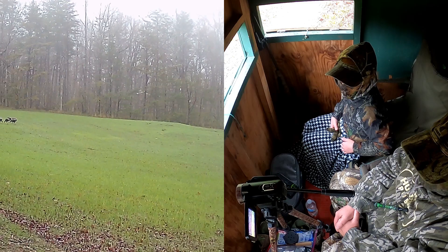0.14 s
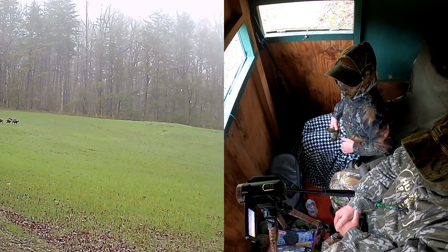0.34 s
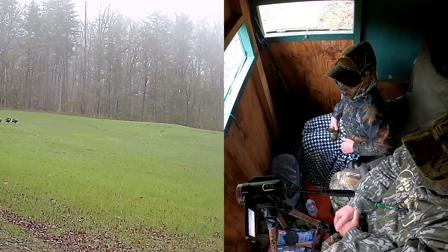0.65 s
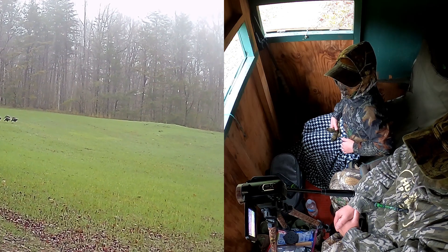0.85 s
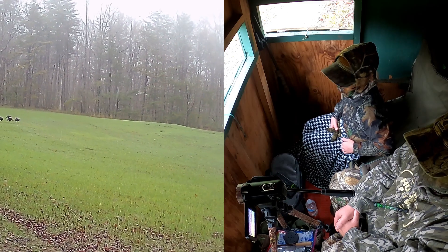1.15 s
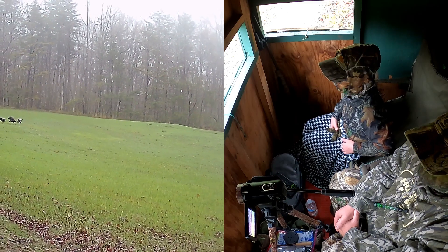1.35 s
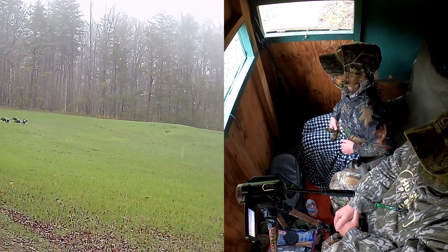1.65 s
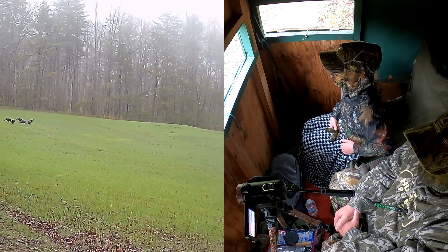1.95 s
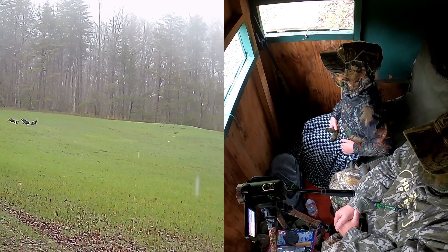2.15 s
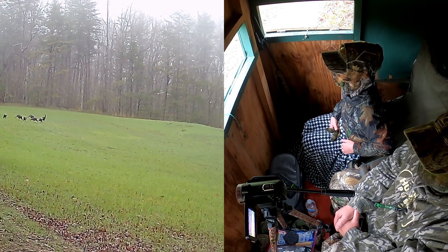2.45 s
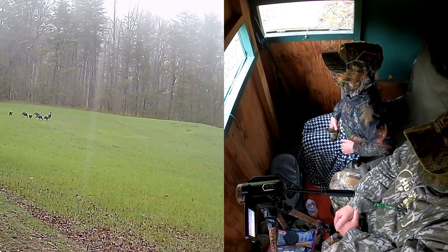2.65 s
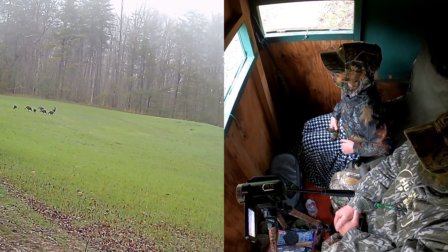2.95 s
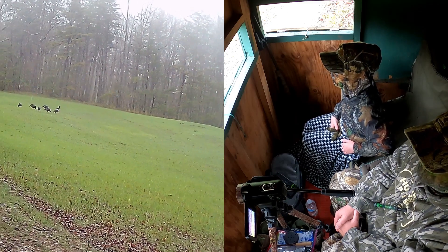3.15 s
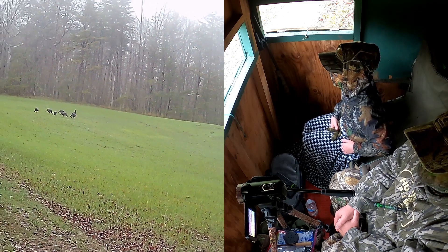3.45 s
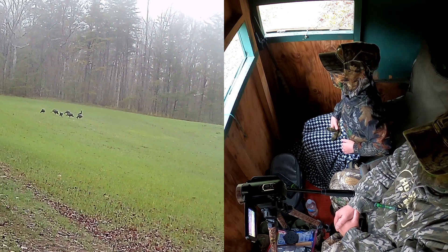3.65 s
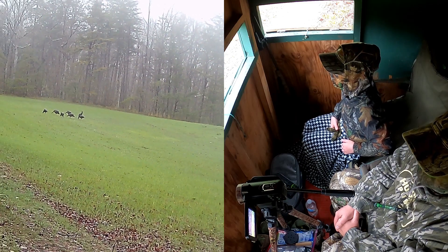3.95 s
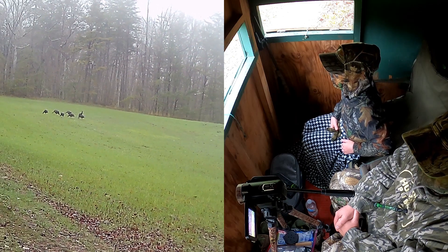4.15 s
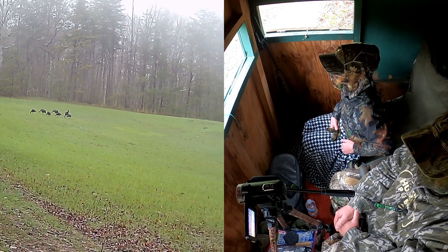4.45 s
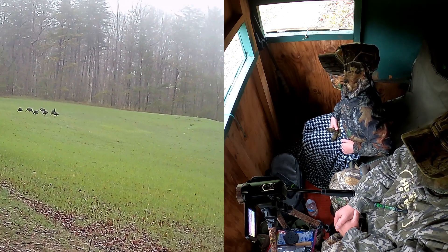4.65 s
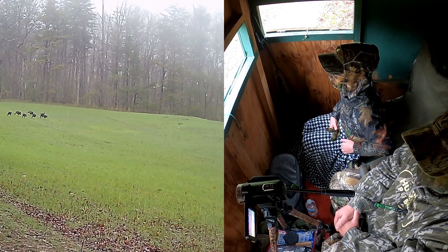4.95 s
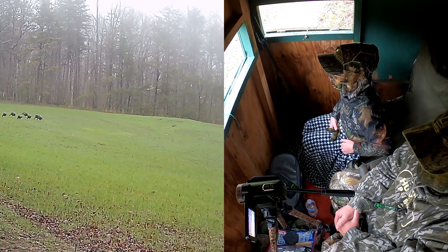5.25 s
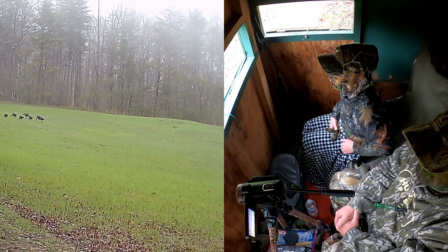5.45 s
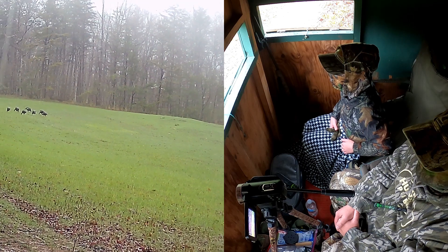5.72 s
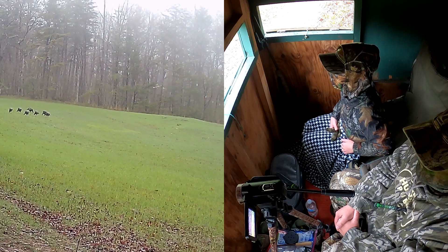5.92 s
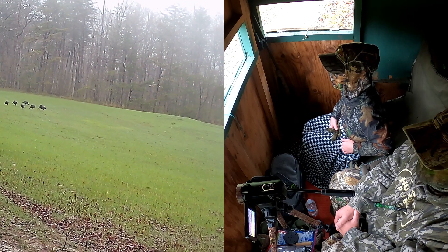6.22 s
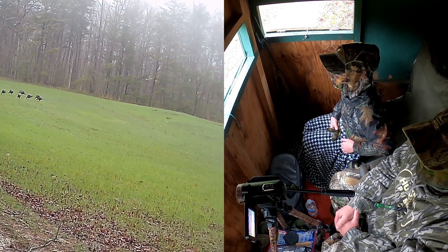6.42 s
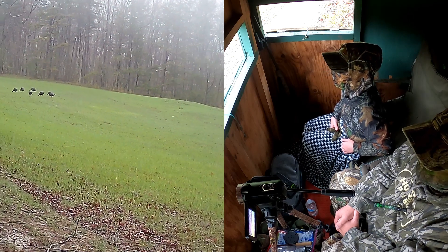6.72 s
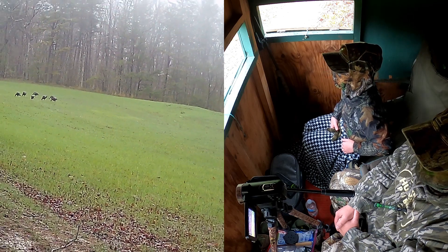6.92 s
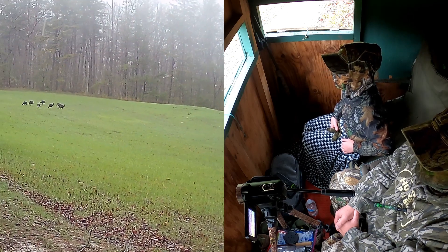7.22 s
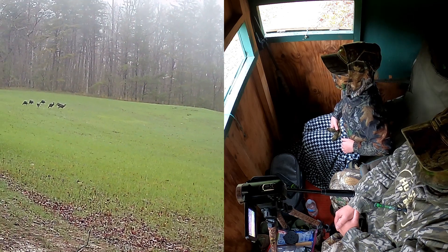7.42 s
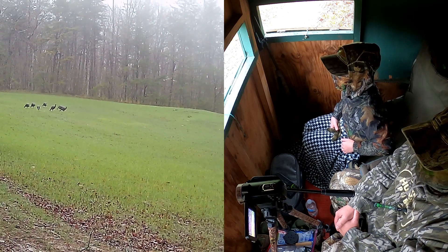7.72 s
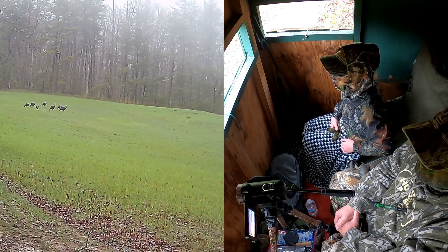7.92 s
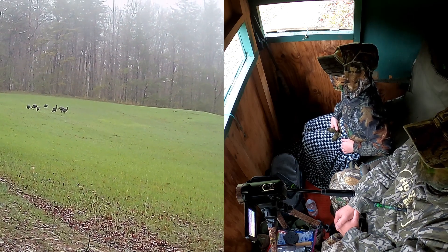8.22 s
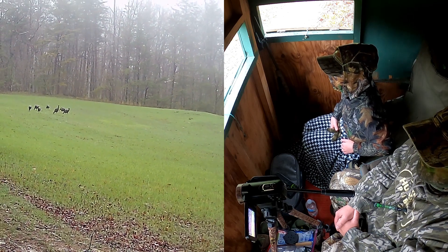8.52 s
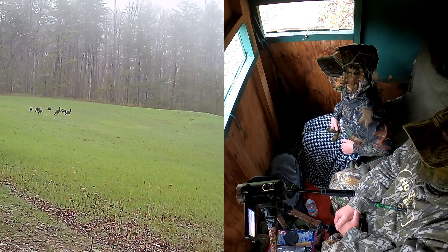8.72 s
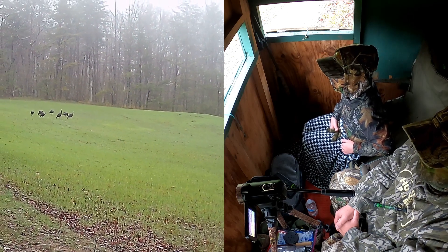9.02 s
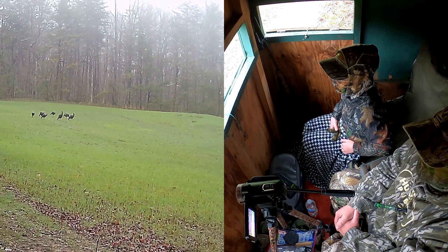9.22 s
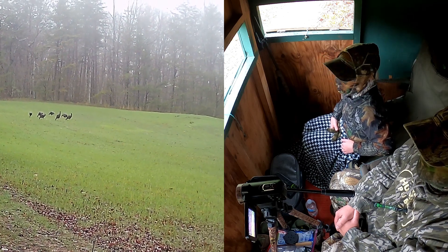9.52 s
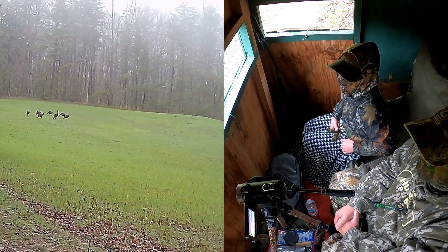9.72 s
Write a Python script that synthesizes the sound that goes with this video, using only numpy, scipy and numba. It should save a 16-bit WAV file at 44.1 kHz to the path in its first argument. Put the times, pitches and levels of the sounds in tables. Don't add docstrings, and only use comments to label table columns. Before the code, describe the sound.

Heard inside a small wooden shelter, irregular heavy drops tick and softly boom on the roof, with light drips, patter and quiet field hiss.

```python
import sys
import numpy as np
from scipy import signal
from scipy.fft import rfft, irfft
from scipy.io import wavfile
from scipy.ndimage import uniform_filter1d
from numba import njit

SR = 44100
rng = np.random.default_rng(int(sys.argv[2]) if len(sys.argv) > 2 else 0)


def gain_from_db(level_db):
    decades = np.asarray(level_db, float) / 20
    return 10 ** decades


def generate_wav(signal):
    frames = np.transpose(np.atleast_2d(signal))
    scaled = np.clip(frames, -1, 1) * 32767
    pcm = np.round(scaled).astype(np.int16)
    wavfile.write(sys.argv[1], SR, pcm)


N = 435250

# pitch in Hz, difference between ears re shared sound in dB.
SIDE_SHARE = [(60, -11.5), (110, -6), (200, -3), (380, -7), (700, -2.5), (1290, -8), (2380, -3.5),
              (4400, -3), (8120, 0), (15000, 1)]
WET_HZ = 2460


def on_log(hz, table):
    f, v = np.transpose(table)
    return np.interp(np.log(hz), np.log(f), v)


def walk(rate):
    k = int(SR / rate)
    held = np.repeat(rng.standard_normal(N // k + 1), k)
    return uniform_filter1d(uniform_filter1d(held, k), k)[:N]


def bed(table, flicker_db, rate):
    # pitch in Hz, left minus right in dB.
    lean_table = [(60, 0.5), (110, 3), (200, -2.5), (380, 0.5), (700, -1.5), (1290, 2), (2380, 6),
                  (4400, 2), (8120, 0), (15000, -2.5)]
    f = np.fft.rfftfreq(N, 1 / SR) + 1
    low, high = table[0][0], table[-1][0]
    colour = gain_from_db(on_log(f, table)) * (f > low) * (f < high)
    mid, side = rfft(rng.standard_normal((2, N))) * colour
    side = side * gain_from_db(on_log(f, SIDE_SHARE))
    lean = gain_from_db(on_log(f, lean_table) / 2)
    pair = np.array([(mid + side) * lean, (mid - side) / lean])
    out = 0
    for k in range(int(2 * np.log2(low)), int(2 * np.log2(high)) + 2):
        share = np.clip(1 - np.abs(2 * np.log2(f) - k), 0, 1)
        depth = 2.5 + 1.1 * (k > 26)
        out = out + irfft(pair * np.sqrt(share), N) * gain_from_db(flicker_db * depth * walk(rate))
    return out / np.std(out.mean(axis=0))


@njit
def add(out, start, hz, t60, rise, left, right):
    for m in range(len(hz)):
        turn = np.exp(2j * np.pi * hz[m] / SR - np.log(1000) / (t60[m] * SR))
        fade = np.exp(-1 / (rise[m] * SR))
        z, soft = 1 + 0j, 1.
        first = int(start[m] * SR)
        for j in range(max(first, 0), min(first + int(.75 * t60[m] * SR), out.shape[1])):
            z, soft = z * turn, soft * fade
            out[0, j] += left[m] * z.imag * (1 - soft)
            out[1, j] += right[m] * z.imag * (1 - soft)


def ring(s, hz, t60, rise, gain, pan_db, other):
    together = np.broadcast_arrays(s, hz, t60, rise, gain, pan_db, other)
    s, hz, t60, rise, gain, pan_db, other = (np.ravel(1. * a) for a in together)
    side = other * np.abs(gain) * gain_from_db(on_log(hz, SIDE_SHARE))
    left, right = (gain + side) * gain_from_db(pan_db / 2), (gain - side) * gain_from_db(-pan_db / 2)
    out = np.zeros((2, N))
    add(out, s, np.clip(hz, 20, .45 * SR), t60, rise, left, right)
    return out


def field_hiss(wind_db):
    # pitch in Hz, level in dB per Hz.
    hiss_colour = [(320, -14), (550, -3), (623, -19), (810, -19), (1070, 1), (1370, 2.5), (1810, -3),
                   (2660, -1), (4690, -4.5), (7720, -10.5), (10800, -25), (12700, -27.5), (15900, -56)]
    gust_db = 0.053 * (wind_db + 66)
    unrest_db = 0.1 * walk(0.96) + 0.53 * walk(9) + 1.76 * walk(45)
    return bed(hiss_colour, 0.82, 18) * gain_from_db(-62.5 + gust_db + unrest_db)


def roof_drumming(drum_db):
    # pitch in Hz, level in dB per Hz.
    drum_colour = [(44, -20), (78, 2), (103, -9.5), (140, -2.5), (172, 5), (205, -2.5), (284, -7),
                   (474, -14), (600, -24.5), (780, -21)]
    return bed(drum_colour, 1.54, 12) * gain_from_db(drum_db - 0.4)


def wind_rumble(wind_db):
    # pitch in Hz, level in dB per Hz.
    wind_colour = [(12, -1.5), (25, -3), (50, -1), (59, -8.5), (75, -40)]
    return bed(wind_colour, 3.8, 5.7) * gain_from_db(wind_db + 11.0)


def focus(hz, board_hz):
    octaves_off = np.log2(hz / board_hz[:, None])
    return 2.5 * np.exp(-(octaves_off / 0.81) ** 2)


def knock(s, knock_db, splash_db, pan_db, board_hz, count, last, pitch):
    # pitch in Hz, time to fade 60 dB in s.
    fade_times = [(600, 0.16), (1100, 0.1), (2900, 0.11), (7700, 0.061), (14000, 0.17)]
    # pitch in Hz, level in dB, time to fade 60 dB in s.
    skin_modes = [(1280, -25, 0.012), (1390, -5, 0.017), (1970, 1.5, 0.02), (2400, 5, 0.011),
                  (3270, 0, 0.024)]
    s, knock_db = s[:, None] + .0008, knock_db[:, None]
    splash_db, pan_db = splash_db[:, None], pan_db[:, None]
    place = rng.random((2, len(s), count))
    spot = rng.standard_normal((3, len(s), count))
    u = (np.arange(count) + place[0]) / count
    hz = 700 + 13500 * u ** 2
    octave = np.log2(hz / 1450)
    db = knock_db + splash_db * np.clip(octave / 1.69, 0, 3) - 25 * np.clip(-octave - .4, 0, 1)
    db = db - 61.0 * np.clip(octave - 2.1, 0, 3) ** 2
    db = db + 10 * np.log10(9000 * u / hz / count) + focus(hz, board_hz)

    tail_s = last * on_log(hz, fade_times)
    tail_start = s + 0.001198 + .004 * place[1]
    tail = ring(tail_start, hz, tail_s, 0.0006, gain_from_db(db - 1.5) * spot[2], 0.3 * pan_db, spot[1])

    step = 0.8 * np.clip(3 - octave, 0, 1) + .7 * spot[0]
    click_db = db + 3.0 - 12.9 * np.clip(.7 - octave, 0, 1)
    click = ring(s + 0.00033, hz, 0.011, 1e-4, gain_from_db(click_db) * step, pan_db, 1.4 * spot[1])

    skin_hz, skin_db, skin_s = np.transpose(skin_modes)
    n = len(skin_modes)
    skin_hz = np.outer(pitch, skin_hz) * (1 + 0.125 * spot[2, :, :n])
    skin_gain = gain_from_db(knock_db + skin_db - 12 + 2 * spot[0, :, :n] + focus(skin_hz, board_hz))
    snap = ring(s + 0.00046, skin_hz, skin_s, 0.00013, skin_gain, pan_db, .5 * spot[1, :, :n])

    own_hz = board_hz[:, None]
    blow_db = knock_db + 14 - 13 * np.clip(np.log2(1450 / own_hz), 0, 1)
    board = ring(s, own_hz, 8.5 / own_hz, .0006, gain_from_db(blow_db), pan_db, 0.47 * spot[1, :, :1])
    return tail + click + board + snap


def patter(count):
    when, size = rng.random((2, count))
    tone, pan = rng.standard_normal((2, count))
    size_db = -66 - np.clip(4.6 * np.log(size), -8.5, 0)
    splash_db = np.minimum(-6 + 14.0 * tone, 2)
    board_hz = WET_HZ * 2 ** (0.49 * tone)
    return knock(when * N / SR, size_db, splash_db, 3 + 2.0 * pan, board_hz,
                 count=32, last=0.26, pitch=2 ** (.5 + 0.404 * tone))


def mist(count):
    when, size = rng.random((2, count, 1))
    spot = rng.standard_normal((3, count, 12))
    hz = 11000 * 2 ** (0.26 * spot[0])
    gain = gain_from_db(-84 - np.clip(4 * np.log(size), -5, 0)) * spot[1]
    return ring(when * N / SR, hz, 0.0073, 1e-4, gain, -2.8, spot[2])


def boom(s, boom_db, thud_db, pan_db):
    # pitch in Hz, level in dB, time to fade 60 dB in s.
    panel_modes = [(45.5, -5.5, 0.28), (108, -3.5, 0.35), (142, -6, 0.081), (161, -1.5, 0.28),
                   (180, -5.5, 0.33), (216.1, -3.5, 0.2), (251.8, -1.5, 0.16), (299.3, 0.5, 0.14),
                   (351.4, 2, 0.094), (404.2, -6, 0.2), (437.3, -1, 0.11), (490, -2, 0.12),
                   (559.6, -5.5, 0.087), (649, -14.5, 0.16), (750, -22, 0.15), (926, -18, 0.16)]
    hz, db, t60 = np.transpose(panel_modes)
    spot = rng.standard_normal((5, len(s), len(hz)))
    level_db = np.where(hz < 230, boom_db[:, None], thud_db[:, None]) + db
    late = s[:, None] + 0.047 / np.sqrt(hz)
    pan_db = 0.31 * pan_db[:, None]
    swing_gain = -gain_from_db(level_db - 7 + 4 * spot[4])
    swing = ring(late, hz, 7.1 / hz, 0.00059, swing_gain, pan_db, 0.25 * spot[3])
    after_gain = gain_from_db(level_db - 2.5 + 3.93 * spot[0]) * np.sign(spot[1])
    after = ring(late, hz * (1 + 0.035 * spot[2]), t60, 0.0031, after_gain, pan_db, 0.5 * spot[3])
    return swing + after


def heavy_drops():
    # start in seconds, knock level in dB, boom in dB re knock,
    # splash in dB re knock, knock pitch in Hz.
    overhead = [(0.9471, -41, -5, -20, 1230), (1.2901, -36.5, -7.5, -8.5, 1680),
                (1.5363, -31.5, -6.5, 1, 2390), (1.6416, -27, -9, -13.5, 1510),
                (1.785, -36.5, -7, -6.5, 2420), (3.0867, -44, -14, -10, 1500),
                (3.3654, -41.5, -9, 2.5, 2400), (3.3965, -36.5, -10, -14, 1400),
                (3.9186, -42, -24, -13, 2090), (4.3025, -33.5, -11, -19, 1130),
                (4.5745, -42, -40, -4.5, 1430), (4.8831, -39, -14, -14.5, 1290),
                (5.7318, -37.5, -3.5, -13, 1470), (6.318, -40, -10.5, -15, 1700),
                (7.3207, -45, -37, -5, 2400), (7.6193, -40.5, -6.5, -8.5, 1250),
                (7.6721, -39.5, -3, -21, 1170), (7.8955, -43, -11, -9, 1920),
                (8.1605, -32.5, -2, -38, 1140), (8.4603, -34, -3, -24, 1160),
                (8.4892, -37.5, -8.5, -12, 1440), (8.6352, -30, -19.5, -23, 1680),
                (9.2545, -42.5, -14, -10, 1540), (9.3705, -37.5, 1, -16.5, 1170)]
    eave = [(0.3029, -36.5, -6.5, -20.5, 1170), (0.4463, -31.5, -8, -8.5, 1660),
            (1.3363, -51, -0.5, -13, 1400), (2.2914, -34, -9.5, -7.5, 1950), (2.576, -50, -1.5, -13, 1900),
            (2.7646, -37, -6.5, -19.5, 1190), (2.8599, -44, -2, -8, 1560),
            (3.4191, -39.5, -20, -10.5, 1500), (3.8437, -43.5, -4.5, -9, 1490),
            (4.1574, -52, -18, -10, 1500), (4.3449, -48.5, -4.5, -4.5, 1500), (4.678, -51.5, 8, -36, 1190),
            (5.1584, -37.5, -12.5, -3, 1630), (5.468, -42, -16, -5, 2020),
            (6.1648, -30.5, -12.5, -18, 1340), (6.2586, -40.5, -20, -5, 1650), (6.6412, -51, -7, -6, 1490),
            (7.1921, -53.5, -4, -3, 1470), (7.4635, -40, -11, -4.5, 2170), (7.962, -32, -7.5, -13.5, 2980),
            (8.32, -49.5, -18, -10, 1290), (8.4248, -51.5, -4, -11, 1470), (8.6761, -46.5, -11, -8, 2040),
            (8.8945, -47.5, -20, -10, 2000)]
    # start in seconds, knock level in dB, boom in dB re knock.
    wet = [(0.6566, -51.5, -10), (0.7937, -51.5, -5.5), (0.9785, -47.5, -13), (1.821, -47, -24),
           (1.8382, -47.5, -26), (1.8745, -51.5, -4), (2.5004, -55.5, -20), (2.6913, -48, -21),
           (2.8437, -52, -22), (3.0007, -57, -27), (4.286, -54, -21), (4.999, -52, -25),
           (5.1424, -52.5, 4.5), (5.2739, -50.5, -24), (5.3451, -52.5, -30), (5.444, -52, -16),
           (5.6535, -45, -12), (5.849, -51.5, -21), (6.3049, -51, -23), (6.4794, -49, -10),
           (6.6771, -52.5, -10), (6.7546, -52, -10), (7.1509, -50.5, -9), (7.2147, -52.5, -7),
           (7.8124, -53.5, -16), (7.9313, -52.5, 9)]
    dull = [(0.597, -54, -2), (1.1047, -57, -15), (1.2543, -55, 1), (1.6925, -46, -3), (2.2739, -54, 11),
            (3.7549, -45, 3), (4.0963, -54, -1.5), (5.6982, -45, -16), (6.3868, -49, -14),
            (6.4395, -52.5, -4), (6.4998, -46, -6.5), (6.8879, -47.5, -27), (7.6052, -50, 4),
            (7.868, -54, 0), (7.9898, -56, -5), (8.0023, -47, 4.5), (8.0404, -56, 0), (8.2646, -50, -6.5),
            (8.6042, -56, 2), (8.6841, -66, -25), (8.7892, -54, -22), (9.1578, -44, -4),
            (9.1995, -46.5, -9), (9.2247, -50, -19), (9.4611, -47.5, -17), (9.6542, -50, -4),
            (9.8276, -41.5, -5.5)]
    roof_side, eave_side = [-4.5, 3], [-0.5, 10]
    kinds = [(overhead, roof_side), (eave, eave_side),
             (wet, [-1, WET_HZ, *roof_side]), (dull, [-10.5, 1400, *roof_side])]
    drops = [[*row, *shared] for rows, shared in kinds for row in rows]
    s, db, low_db, splash_db, hz, thud_db, pan_db = np.transpose(drops)
    pan_db = pan_db + 4.5 * rng.standard_normal(len(s))
    pitch = 2 ** (0.026 * (splash_db + 19.0))
    near = knock(s, db, splash_db, pan_db, hz, count=200, last=0.82, pitch=pitch)
    return near + boom(s, db + low_db, db + low_db + thud_db, pan_db)


def thumps():
    # start in seconds, level in dB, pitch in Hz.
    deep_rings = [(0.445, -29, 175), (1.327, -43, 212), (1.559, -33, 180), (1.654, -31.5, 189.5),
                  (1.931, -40.5, 170), (2.294, -34.5, 106.3), (3.376, -46, 170), (3.76, -31, 149),
                  (4.385, -32, 185), (4.411, -33.5, 108), (4.676, -35.5, 269), (5.155, -35, 174),
                  (5.738, -36, 109), (6.36, -38.5, 166), (7.227, -44, 176), (7.47, -40.5, 190),
                  (7.615, -53, 171), (7.678, -49, 157), (7.936, -37, 170), (8.16, -35, 113.3),
                  (8.462, -26.5, 121), (8.5, -31, 100), (9.371, -29.5, 161), (9.392, -40, 108),
                  (9.827, -53, 171)]
    s, db, hz = np.transpose(deep_rings)[:, :, None]
    other = rng.standard_normal((len(s), 3))
    gain = gain_from_db(db + np.array([-9.0, -5.0, -11.0]))
    return ring(s, hz * np.array([.92, 1, 1.1]), 28.8 / hz, 0.0041, gain, 0.76, .5 * other)


def splashes():
    # start in seconds, level in dB, pitch in Hz, left minus right in dB.
    sill_hits = [(0.496, -45, 4510, -3), (0.554, -50.5, 6240, -1), (0.683, -46, 4020, 8),
                 (0.7622, -55, 8040, -1), (1.3595, -56, 5360, -1), (1.6626, -52, 8000, -2.5),
                 (2.2337, -47, 4780, 0.5), (3.3641, -44, 6900, -6), (3.842, -42, 7000, 3),
                 (4.7243, -51, 8000, 0.5), (4.83, -44.5, 4550, 6), (4.999, -53, 4500, -2),
                 (5.4552, -47, 5740, 6), (6.298, -38, 4000, 0), (6.827, -44.5, 5600, -1),
                 (6.957, -47, 5650, -2), (7.058, -43, 4280, -0.5), (7.0753, -41, 5270, 2),
                 (7.2878, -46, 6500, 2), (7.37, -38.5, 7770, 0), (8.217, -46, 4930, 3),
                 (8.6286, -64, 5200, 2), (9.2547, -47, 7300, 0), (9.2843, -51, 8000, -1),
                 (9.612, -46, 6400, 1), (9.751, -49, 5430, 2)]
    s, db, hz, pan_db = np.transpose(sill_hits)[:, :, None]
    spot = rng.standard_normal((4, len(s), 60))
    octave = 0.44 * spot[0]
    gain = gain_from_db(db - 17.5 - 3.8 * octave) * spot[1]
    spray_start = s + 0.0011 * np.abs(spot[3])
    return ring(spray_start, hz * 2 ** octave, 0.0075, 1e-4, gain, pan_db, spot[2])


def drips():
    # start in seconds, level in dB, pitch in Hz, left minus right in dB.
    droplets = [(0.6716, -49, 2700, 6), (0.7983, -67, 10490, -3), (0.8105, -62, 9300, -1),
                (1.5965, -47, 4730, -2), (1.8383, -49, 6740, -3), (2.5017, -47, 1320, 3),
                (2.9, -48, 3600, 4), (3.0016, -62, 9040, 6), (3.017, -47, 3020, 3), (3.1741, -51, 4890, 0),
                (3.2236, -49.5, 1450, 3), (3.5183, -64, 9000, -7), (3.541, -50, 1210, 2),
                (3.7219, -49, 3790, 8), (3.9199, -59, 9000, -2), (4.1792, -52, 2940, 10),
                (4.6009, -45, 2910, 5), (4.738, -46, 3250, 4), (4.8302, -59, 10360, 1),
                (5.0001, -66, 10100, 2), (5.1925, -45, 5100, -5), (5.4447, -51, 2500, 9),
                (5.7562, -60, 9410, 2), (6.0278, -50.5, 1510, 2), (6.263, -56, 8900, 1),
                (6.3457, -44, 1580, 7), (6.7123, -57, 9050, -2), (6.9301, -49, 4760, -2),
                (7.0588, -59, 9580, -1), (7.1194, -46, 3940, 7), (7.1782, -61, 9130, 0),
                (7.215, -51, 1220, 6), (7.2421, -62, 9470, 3), (7.5726, -58, 9300, 3),
                (7.6527, -64, 9520, 1), (7.9636, -54, 9040, 10), (7.9896, -44, 1260, 0),
                (8.124, -53, 2470, 7), (8.2174, -64, 9280, 3), (8.6285, -59, 5040, 6),
                (8.896, -47, 2900, 9), (9.3722, -51, 4840, 1)]
    s, db, hz, pan_db = np.transpose(droplets)[:, :, None]
    spot = rng.standard_normal((4, len(s), 16))
    core_s = 12 / hz + 0.005
    core = ring(s - .0006, hz, core_s, .0003, gain_from_db(db + 1.5), pan_db, .3 * spot[0, :, :1])
    halo_start, halo_hz = s + .0015 * np.abs(spot[3]), hz * 2 ** (0.222 * spot[2])
    halo_gain = gain_from_db(db - 14) * spot[1]
    halo = ring(halo_start, halo_hz, 0.02, 0.00045, halo_gain, pan_db, 0.94 * spot[0])
    return core + halo


def bird():
    # start in seconds, length in seconds, first pitch in Hz, last pitch in Hz, level in dB,
    # flutter from 0 to 1.
    notes_sung = [
        (1.994, 0.3, 3740, 3800, -66.5, 1),
        (2.3, .13, 3720, 3660, -72, 1),
        (2.565, 0.075, 3950, 3640, -63.5, .15),
    ]
    t, out = np.arange(N) / SR, 0
    wobble = 0.017 * walk(120) + 0.005 * walk(9.2)
    flutter_db = 3.5 * walk(60)
    for s, length, first_hz, last_hz, db, flutter in notes_sung:
        u = np.clip((t - s) / length, 0, 1)
        hz = (first_hz + (last_hz - first_hz) * u) * (1 + flutter * wobble)
        turns = np.cumsum(hz) / SR
        swell = np.abs(np.sin(np.pi * u)) ** 0.8
        out = out + swell * gain_from_db(db + flutter * flutter_db) * np.sin(2 * np.pi * turns)
    return out * gain_from_db(np.array([[1.5], [-1.5]]))


def scene():
    # time in seconds, wind level in dB, roof drumming level in dB.
    weather = [(0.0, -70, -62.5), (0.47, -74.5, -62), (0.96, -71.5, -64), (1.51, -66.5, -56),
               (1.812, -70, -58.5), (2.08, -58.5, -64.5), (2.5, -64, -61.5), (2.89, -67.5, -66),
               (3.79, -67.5, -57), (4.26, -60, -63), (4.56, -76.5, -63.5), (4.92, -66, -64),
               (5.69, -63.5, -59.5), (6.65, -65, -61), (6.92, -56, -61), (8.19, -60.5, -61.5),
               (9.34, -65, -59), (9.87, -74.5, -62)]
    s, *columns = np.transpose(weather)
    wind_db, drum_db = (np.interp(np.arange(N) / SR, s, c) for c in columns)
    background = field_hiss(wind_db) + roof_drumming(drum_db) + wind_rumble(wind_db)
    fine = patter(count=1500) + mist(count=250) + splashes() + drips()
    return background + fine + heavy_drops() + thumps() + bird()


def band_limit(x):
    return signal.sosfilt(signal.butter(12, 15780, fs=SR, output="sos"), x)


def record(dry):
    return band_limit(dry)


dry = scene()
out = record(dry)
generate_wav(out)
```